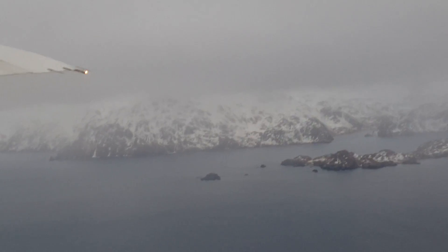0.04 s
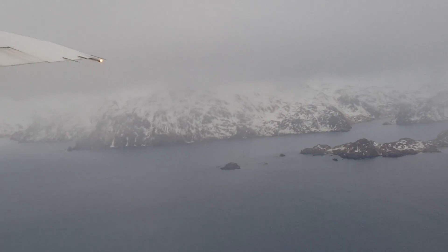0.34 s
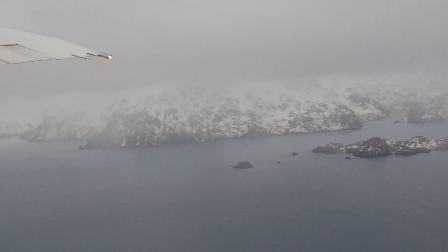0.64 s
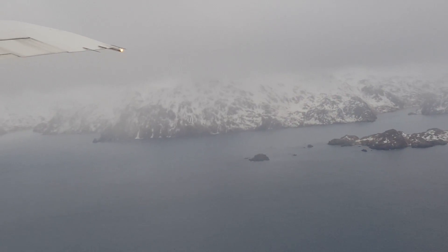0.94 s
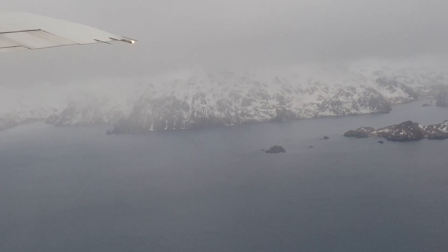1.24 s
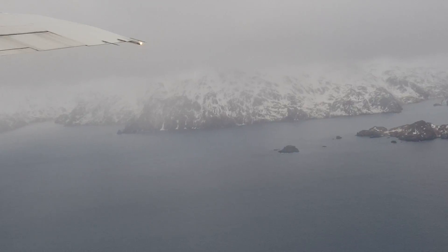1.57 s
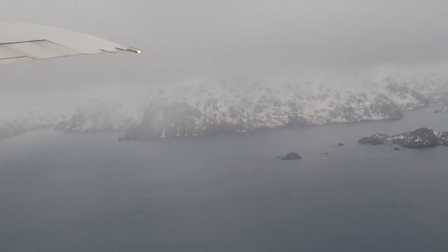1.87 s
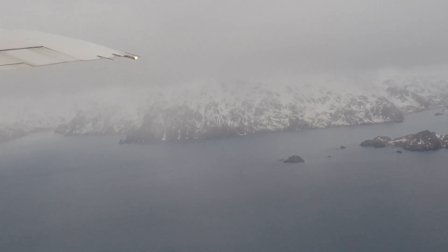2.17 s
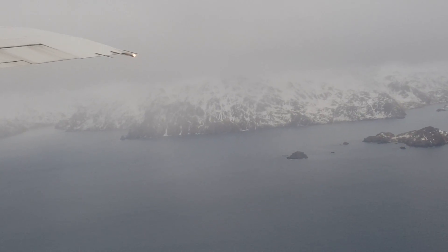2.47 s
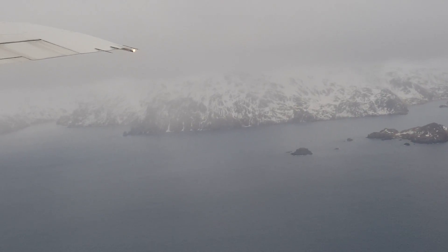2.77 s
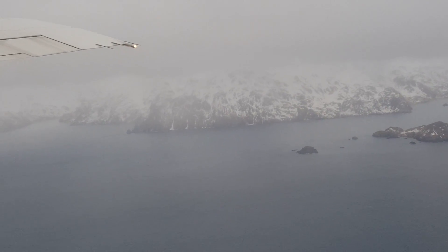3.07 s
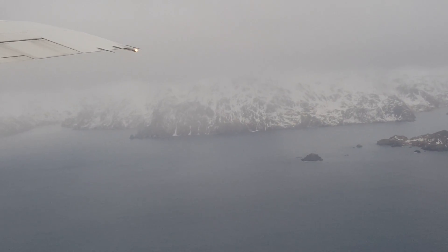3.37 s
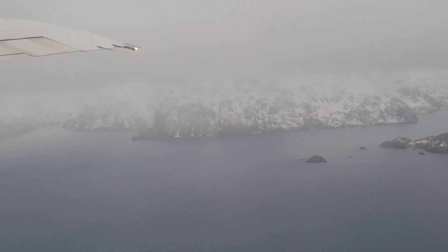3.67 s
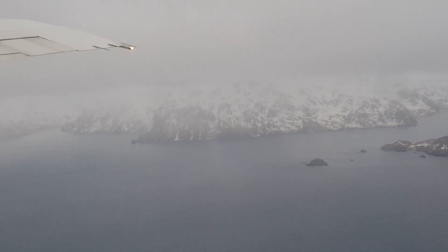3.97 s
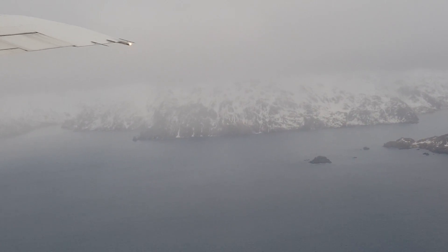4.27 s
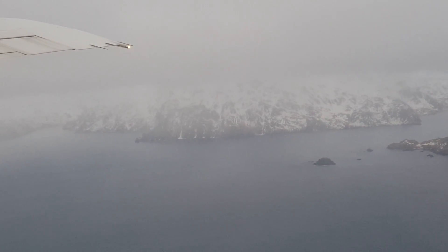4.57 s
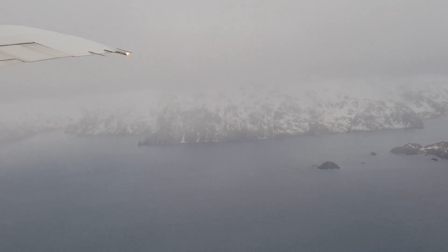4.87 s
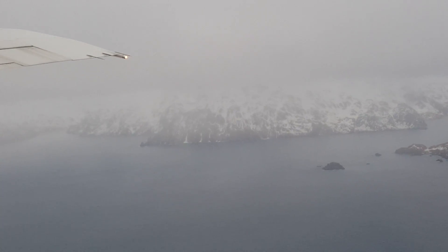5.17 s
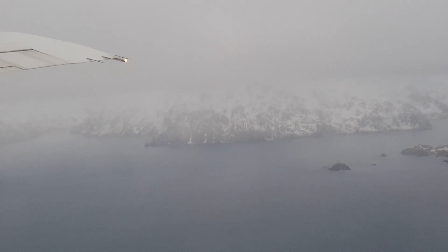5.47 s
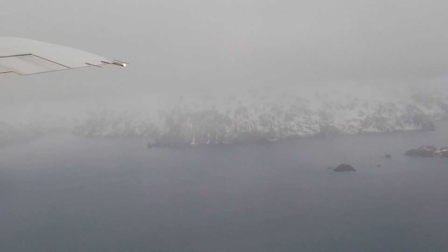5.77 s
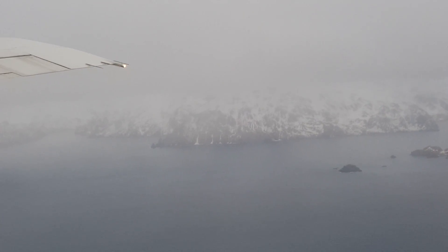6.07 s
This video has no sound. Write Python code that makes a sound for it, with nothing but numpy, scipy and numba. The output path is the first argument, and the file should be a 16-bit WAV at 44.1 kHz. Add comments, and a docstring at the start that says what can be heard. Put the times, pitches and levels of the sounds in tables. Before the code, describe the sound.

A loud, steady, low engine roar and rushing air fill an airliner cabin as the plane climbs.

```python
"""Airliner cabin during the climb

At a window seat by the wing, engine roar booms at the low pitches the cabin likes to ring at.
Air rushes along the plane's skin, vents hiss and a faint turbine whine sets in.
Plastic trim ticks and clothes rustle. A limiter turns everything down a little when the boom swells."""
import sys
import numpy as np
from scipy import signal
from scipy.fft import rfft, irfft
from scipy.io import wavfile
from scipy.ndimage import uniform_filter1d, minimum_filter1d
from numba import njit

SR = 44100
rng = np.random.default_rng(int(sys.argv[2]) if len(sys.argv) > 2 else 0)


def pcm_store(signal):
    """Save signal as 16-bit PCM."""
    levels = np.round(np.clip(np.atleast_2d(signal), -1, 1) * 32767)
    wavfile.write(sys.argv[1], SR, levels.astype(np.int16).T)


N = 274302
TIME = np.arange(N) / SR
FREQS = np.maximum(np.fft.rfftfreq(N, 1 / SR), 1)

# Soft rustles of clothing. Each row: middle in seconds, level in dB, half length in seconds.
RUSTLE_TIMES = [(.462, -58, .012), (.57, -61.5, .05), (1.175, -61.5, .04), (4.44, -60, .012),
                (5.08, -60, .012), (5.317, -65.5, .04), (5.605, -61, .01)]
# The tone of sliding cloth. Each row: frequency in Hz, relative level in dB.
CLOTH_COLOUR = [(1500, -5), (4200, 0), (6500, -2), (8700, -1), (10500, -16.5), (15500, -19.5)]
# Ticks of the plastic trim. Each row: start in seconds, level in dB, seconds to fade by 60 dB,
# brightness in dB per octave, left minus right in dB.
TRIM_TICKS = [(.534, -42, .035, -1.5, 1), (2.0936, -30, .014, -3.5, -7), (5.734, -39.5, 0.064, 0, 0),
              (5.747, -49, 0.091, 3.5, -1)]
# The tone of a tick. Each row: frequency in Hz, relative level in dB.
TICK_COLOUR = [(600, -14), (1600, 8.5), (2800, 0), (4500, 0), (6500, -4), (8300, -1), (10500, -15.5),
               (15500, -12)]
# The hiss of the air vents. Each row: frequency in Hz, relative level in dB.
VENT_COLOUR = [(2000, -3.5), (4200, 1), (5600, -1), (6600, -2.5), (7300, -7.5), (8200, -1.5), (8900, -1),
               (10000, -18.5), (13500, -15), (16000, -20)]
# The rush of air outside. Each row: frequency in Hz, relative level in dB.
RUSH_COLOUR = [(25, -14), (170, 3.5), (370, -1.5), (480, -2.5), (550, -7.5), (620, -8), (730, -16.5),
               (800, -13), (900, -19), (1130, -20), (1270, -25), (2400, -33), (3500, -45), (6000, -68.5)]
# Where the cabin and its wall panels ring. Each row: pitch in Hz, width in Hz, relative level in dB.
CABIN_RESONANCES = [(54.4, 18, -8), (87.6, 31, -6), (108, 32, -7), (137, 21, -10.5), (171.3, 45.7, -0.5),
                    (209.1, 47, -2.5), (247.3, 32, -5), (304.9, 37, -5.5), (351.6, 50, -11),
                    (391.9, 48, -13.5), (431.7, 31, -19.5)]
# Brief dips in the roar and air noise. Each row: middle in seconds, change in dB, half length in seconds.
LEVEL_DIPS = [(0.156, -1.5, .2), (2.75, -2, .35)]
# How the two sides of the seat differ. Each row: frequency in Hz, left minus right in dB.
SEAT_BALANCE = [(90, 0.5), (160, 2), (260, 0.5), (400, 1.2), (530, 2.5), (790, -1.5), (1100, -0.5),
                (1400, 2.5), (2600, 3), (4800, 0), (6400, -6), (7700, 1), (9500, -2.5), (14000, -1.5)]
# How alike noise from all around is at the two microphones.
# Each row: frequency in Hz, likeness (1 is the same, 0 unrelated, -1 opposite).
STEREO_LIKENESS = [(400, 0.66), (560, -0.23), (700, .1), (1100, -0.12), (1400, -0.4), (2100, 0.066),
                   (3700, -0.089), (8000, 0)]


def undb(db):
    """Turn decibels into a number to multiply by."""
    return 10 ** (np.asarray(db) / 20)


def unit(x):
    """Scale a signal to an average strength (rms) of 1."""
    return x / np.sqrt(np.mean(x ** 2))


def curve(rows):
    """Join (Hz, value) rows with straight lines along a scale of octaves."""
    hz, value = np.transpose(rows)
    return np.interp(np.log(FREQS), np.log(np.sort(hz)), value)


def shape(x, gain):
    """Filter a signal, giving each frequency its own gain."""
    return irfft(rfft(x) * gain, N)


def noise(gain):
    """Make fresh noise with the given gain at each frequency."""
    return shape(rng.standard_normal(N), gain)


def wander(rate_hz):
    """A smooth random wobble of size 1; a higher rate makes it quicker."""
    return unit(noise(np.exp(-(FREQS / rate_hz) ** 2) * (FREQS < SR / 2)))


def dips_db():
    """The level sinks and comes back smoothly at each dip."""
    return sum(db * np.exp(-((TIME - middle) / half) ** 2) for middle, db, half in LEVEL_DIPS)


def at_seat(pair, echo_gain=.065, echoes=14, longest_s=.012):
    """Short echoes off the wall and seat colour the left and right sides differently."""
    delays = rng.uniform(longest_s / 10, longest_s, (echoes, 2))
    taps = np.zeros((2, N))
    taps[[0, 1], (delays * SR).astype(int)] = echo_gain
    ripple = 1 + rfft(taps) * FREQS / (FREQS + 900)  # low sounds bend round the seat
    balance = undb(np.outer([.5, -.5], curve(SEAT_BALANCE)))
    return shape(pair, ripple * balance)


def surround_noise(colour_rows):
    """Noise arrives from all sides, so it is only partly alike on the left and right."""
    colour = undb(curve(colour_rows))
    alike = np.clip(curve(STEREO_LIKENESS), -1, 1)
    shared = noise(colour * np.sqrt(1 + alike))
    opposite = noise(colour * np.sqrt(1 - alike))
    return unit(at_seat(np.array([shared + opposite, shared - opposite])))


def clothes_rustle(grain_db=4.0):
    """Cloth slides for a moment: a grainy hiss that swells and fades."""
    swells = sum(undb(db) * np.exp(-((TIME - middle) / half) ** 2) for middle, db, half in RUSTLE_TIMES)
    return surround_noise(CLOTH_COLOUR) * swells * undb(grain_db * wander(300))


def trim_ticks(rise_s=.0004, pivot_hz=4000):
    """A plastic panel slips: a short, dry burst that dies away."""
    out = 0
    for start, db, fade_s, brightness, pan_db in TRIM_TICKS:
        age = np.maximum(TIME - start, 0)
        envelope = (1 - np.exp(-age / rise_s)) * np.exp(-np.log(1000) * age / fade_s)
        colour = [(hz, level + brightness * np.log2(hz / pivot_hz)) for hz, level in TICK_COLOUR]
        side_gains = undb(db + pan_db * np.array([[.5], [-.5]]))
        out = out + side_gains * envelope * surround_noise(colour)
    return out


def vent_hiss(level_db=-58.5, flicker_db=1.04):
    """Air leaves the vents with a high, fairly even hiss."""
    return surround_noise(VENT_COLOUR) * undb(level_db + flicker_db * wander(30))


def turbine_whine(hz=1148, level_db=-49, start_s=1.6, rise_s=.35, fade_db_per_s=.6, upper_hz=2178):
    """Turbine blades sing a thin tone that wavers in moving air; a faster stage adds a fainter one."""
    pitch = hz + .25 * wander(5.1)
    phase = 2 * np.pi * np.cumsum(pitch) / SR
    right = np.sin(phase - 2 * np.pi * hz * .00009) * undb(-10)  # later and quieter than the left
    tone = np.sqrt(2) * np.array([np.sin(phase), right])
    age = np.maximum(TIME - start_s, 0)
    waver_db = 2.0 * wander(4)
    envelope = np.minimum(age / rise_s, 1) * undb(level_db - fade_db_per_s * age + waver_db)
    upper_band = 1 / (1 + ((FREQS - upper_hz) / 9) ** 2)  # so narrow that noise sounds like a tone
    return tone * envelope + unit(noise(upper_band)) * undb(-69)


def air_rush(level_db=-22.5, buffet_db=1.09):
    """Swirling air beats on the plane's skin, so its rush trembles."""
    return surround_noise(RUSH_COLOUR) * undb(level_db + buffet_db * wander(25))


def engine_roar(level_db=-10, lowest_hz=35, steadiness=.51, delay_s=.00012, dip_share=.98):
    """Jet roar makes the cabin ring; the long waves reach both sides alike, the left one first."""
    power = sum((undb(db) / (1 + (hz / width * (FREQS / hz - hz / FREQS)) ** 2)) ** 2
                for hz, width, db in CABIN_RESONANCES)
    boom = noise(np.sqrt(power / (1 + (lowest_hz / FREQS) ** 10)))
    # Partly even out the slow swells and keep the quick flutter.
    local_power = uniform_filter1d(boom ** 2, size=1300, mode="wrap")
    strength = np.sqrt(uniform_filter1d(local_power, size=700, mode="wrap"))
    left = unit(boom / strength ** steadiness)
    right = shape(left, np.exp(-2j * np.pi * FREQS * delay_s))
    return at_seat(np.array([left, right])) * undb(level_db + dip_share * dips_db())


def scene(air_growth_db_per_s=.08):
    """Everything heard from the seat; the air noise grows slowly through the climb."""
    roar = engine_roar()
    air = (air_rush() + vent_hiss()) * undb(air_growth_db_per_s * TIME + dips_db())
    return roar + air + turbine_whine() + trim_ticks() + clothes_rustle()


@njit
def follow_peaks(x, attack, release):
    """Track how loud a signal is: quick to rise, slow to fall."""
    out, level = np.empty(len(x)), x[0]
    for i in range(len(x)):
        level += (x[i] - level) * (attack if x[i] > level else release)
        out[i] = level
    return out


def record(dry, boost_db=.82, limit_db=-2.0, attack_s=.00062, release_s=.08, top_hz=15650):
    """The camera's limiter holds down the peaks of the boom; the highest treble is cut."""
    x = dry * undb(boost_db) * np.minimum(TIME / .0016, 1)  # a soft start
    attack, release = 1 - np.exp(-1 / (attack_s * SR)), 1 - np.exp(-1 / (release_s * SR))
    peak = follow_peaks(np.abs(x).max(axis=0), attack, release)
    gain = np.minimum(1, undb(limit_db) / (peak + 1e-9))
    # Ease the gain down ahead of each peak, so that it does not click.
    gain = minimum_filter1d(gain, size=260)
    gain = uniform_filter1d(uniform_filter1d(gain, size=130), size=130)
    treble_cut = signal.ellip(12, .2, 70, top_hz, fs=SR, output="sos")
    return signal.sosfilt(treble_cut, x * gain)


dry = scene()
out = record(dry)
pcm_store(out)
```